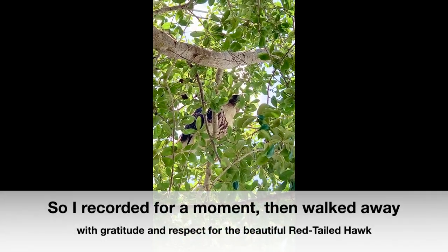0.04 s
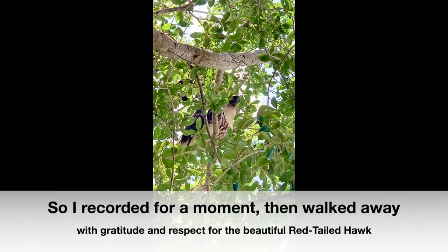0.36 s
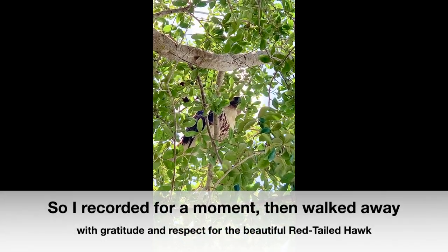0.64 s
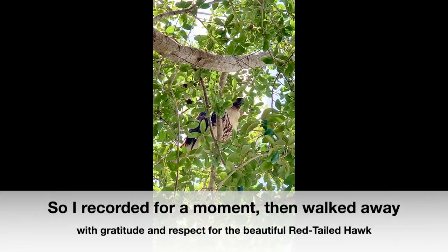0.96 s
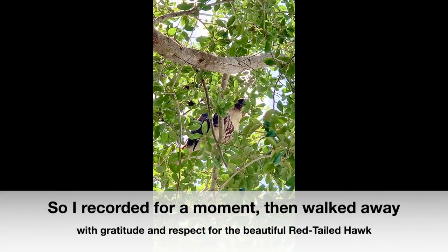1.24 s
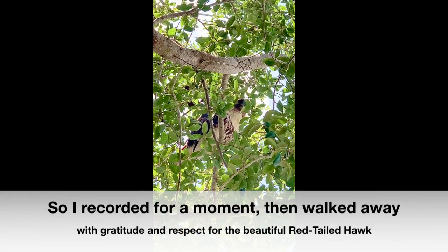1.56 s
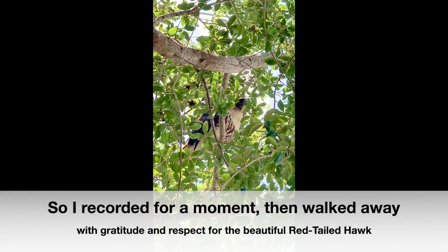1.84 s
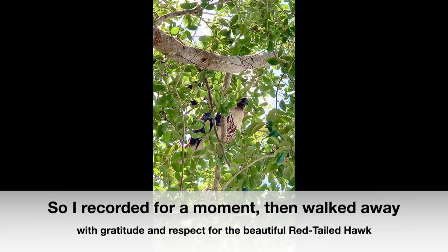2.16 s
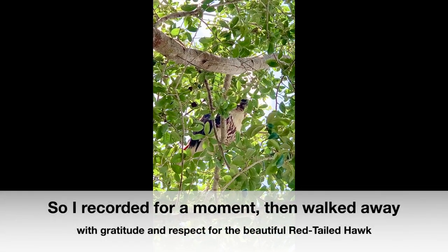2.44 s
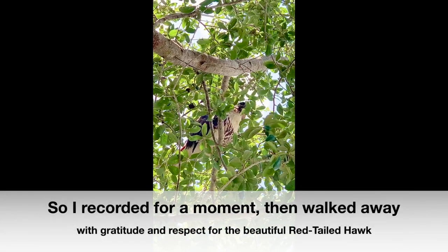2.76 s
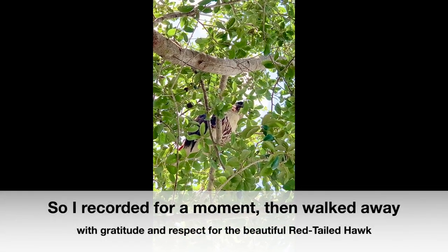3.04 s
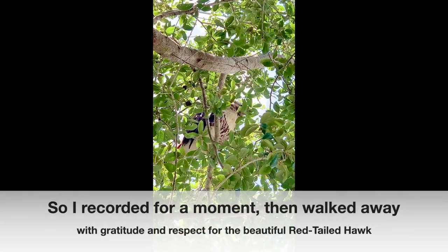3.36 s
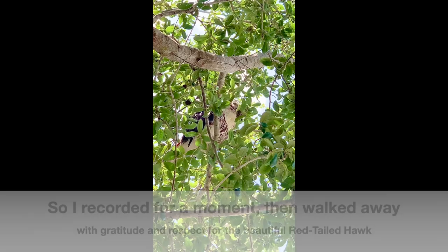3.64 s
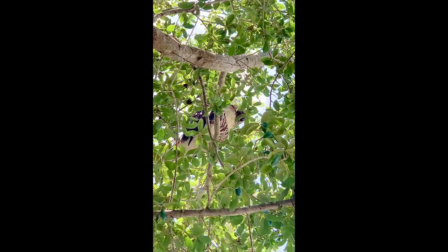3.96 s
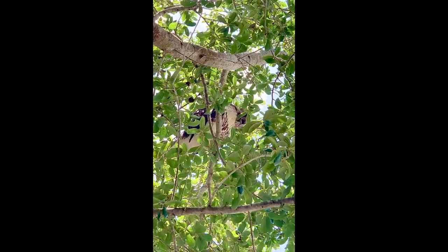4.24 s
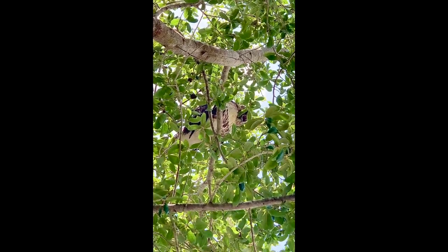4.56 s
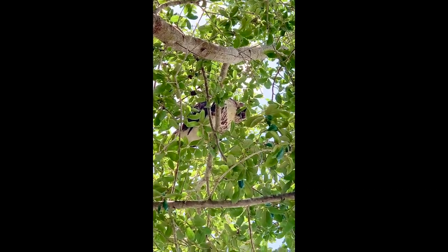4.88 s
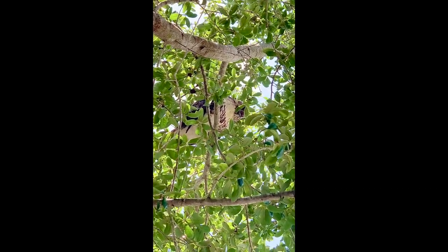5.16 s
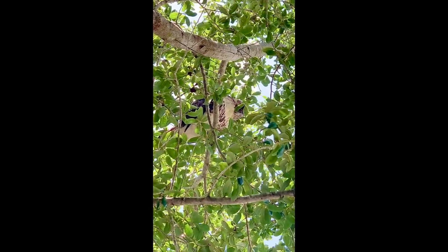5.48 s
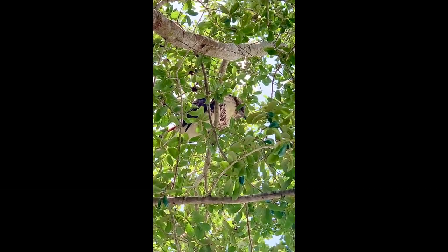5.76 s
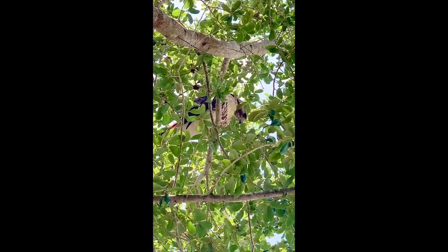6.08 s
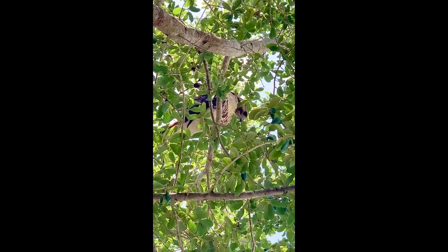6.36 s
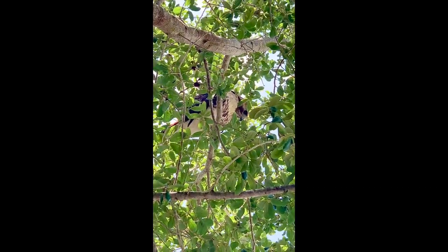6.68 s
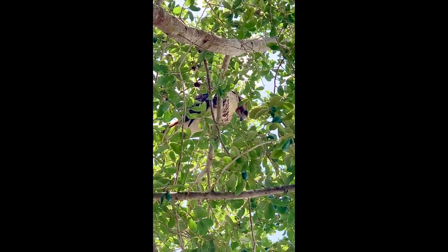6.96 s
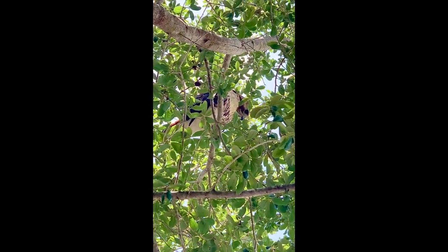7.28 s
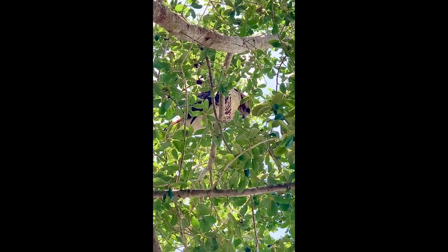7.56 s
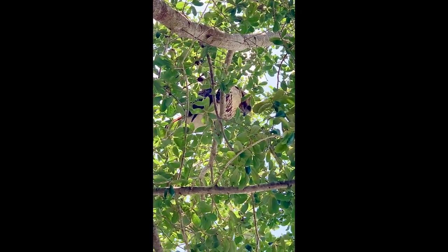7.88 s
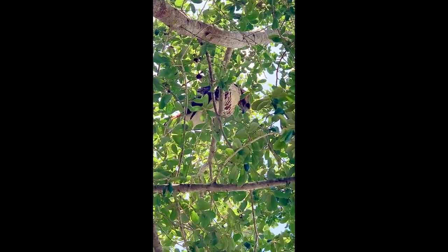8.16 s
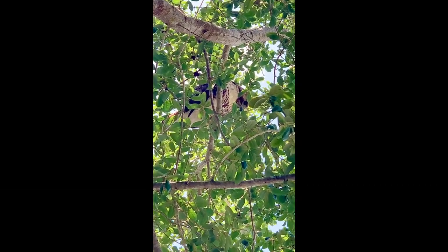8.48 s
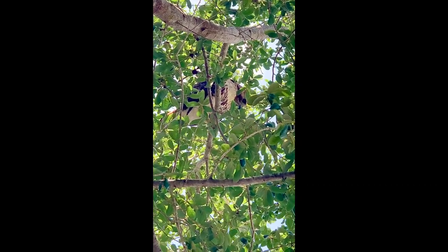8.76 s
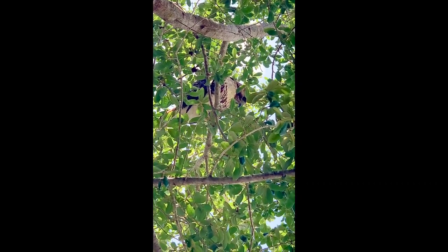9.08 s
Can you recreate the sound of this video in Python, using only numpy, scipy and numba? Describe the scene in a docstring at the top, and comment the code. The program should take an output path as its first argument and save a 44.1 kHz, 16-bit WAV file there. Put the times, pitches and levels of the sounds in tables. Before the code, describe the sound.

Low gusts and soft hand bumps touch the microphone outdoors under trees. After a faint, squeaky wheeze, a hawk gives a single long, harsh scream that starts bright, turns raspy and breaks into short whistles before giving out. The rest is quiet: uneven wind, lightly stirring leaves, a few faint high chirps and the drone of a far engine, which grows toward the end.

```python
"""In a leafy tree outdoors, a hawk wheezes faintly, then gives one long, hoarse scream.
Rough pulses of air ring in its throat; the pitch sinks as it tires, and the voice cracks into brief
clean whistles that echo off limbs, ground and leaves. Small birds chip high in the canopy.
Air and handling rumble on the microphone, and far machinery hums under a hush of traffic and leaves.
The sound is stereo: it reaches the microphone's two openings (ports) a little differently."""
import sys
import numpy as np
from scipy import signal
from scipy.fft import rfft, irfft, next_fast_len
from scipy.io import wavfile
from scipy.ndimage import uniform_filter1d
from numba import njit

SR = 44100
rng = np.random.default_rng(int(sys.argv[2]) if len(sys.argv) > 2 else 0)


def file_out(sig):
    """Save sig as 16-bit WAV at sys.argv[1]."""
    # one column per channel
    cols = np.atleast_2d(sig).T
    # limit, then scale
    lim = np.clip(cols, -1, 1)
    pcm = np.round(lim * 32767).astype(np.int16)
    wavfile.write(sys.argv[1], SR, pcm)


N = 424241
T = np.arange(N) / SR
LEFT_RIGHT = np.array([[1], [-1]])   # plus for the left port, minus for the right


def from_db(db):
    """Turn decibels into a number to multiply by."""
    return 10 ** (np.asarray(db) / 20)


def unit_power(x):
    """Scale a sound to an average power of 1."""
    return x / np.sqrt(np.mean(x ** 2) + 1e-20)


def evened(x):
    """Hold the power near 1 from moment to moment."""
    return x / np.sqrt(np.abs(uniform_filter1d(x ** 2, size=1800)) + 1e-12)


def curves(rows):
    """Join rows of (time_s, values...) into one curve for each value."""
    times, *columns = np.transpose(rows)
    return [np.interp(T, times, column) for column in columns]


def window(start_s, end_s, edge_s):
    """1 between two times, with sloping edges."""
    return np.clip(np.minimum(T - start_s, end_s - T) / edge_s + .5, 0, 1)


def swell(time_s, half_length_s):
    """A smooth hill of height 1."""
    return np.exp(-((T - time_s) / half_length_s) ** 2)


def phase_of(pitch_hz):
    """The running angle of a tone whose pitch may change."""
    return 2 * np.pi * np.cumsum(pitch_hz) / SR


def butter(x, order, edge_hz, kind="low"):
    """Keep the lows, the highs or a band."""
    return signal.sosfilt(signal.butter(order, edge_hz, kind, fs=SR, output="sos"), x)


def noise():
    """White noise."""
    return rng.standard_normal(N)


def drift(rate_hz):
    """Slow or quick random wandering, about 1 in size."""
    return unit_power(butter(rng.standard_normal(N + SR), 2, rate_hz)[SR:])


def filtered(x, response):
    """Multiply each frequency by response(hz)."""
    size = next_fast_len(N + SR)
    hz = np.maximum(np.fft.rfftfreq(size, 1 / SR), 1)
    return irfft(rfft(x, size) * response(hz), size)[..., :N]


def coloured(x, colour):
    """Shape a sound by rows of (frequency_hz, level_db), fading beyond both ends."""
    points_hz, db = np.transpose(colour)

    def response(hz):
        ends = np.minimum(hz / points_hz[0], 1) * np.minimum(points_hz[-1] / hz, 1)
        return from_db(np.interp(np.log(hz), np.log(points_hz), db)) * ends ** 2

    return filtered(x, response)


def coloured_noise(colour):
    """Shaped noise with a power of 1."""
    return unit_power(coloured(noise(), colour))


def resonance(x, hz, width_hz):
    """Let one narrow band ring through."""
    r = np.exp(-np.pi * width_hz / SR)
    feedback = [1, -2 * r * np.cos(2 * np.pi * hz / SR), r * r]
    return signal.lfilter(np.array([1, 0, -1]) * (1 - r * r) / 2, feedback, x)


@njit
def smoothed(x, step):
    """Keep the lows below a moving edge (step, in radians a sample)."""
    out, level, slope = np.zeros_like(x), 0j, 0j
    for i in range(len(x)):
        slope += step[i] * (x[i] - level - np.sqrt(2) * slope)
        level += step[i] * slope
        out[i] = level
    return out


def moving_resonance(x, hz, width_hz):
    """A ringing band whose centre and width follow curves."""
    turn = np.exp(1j * phase_of(hz))
    return np.real(turn * smoothed(x / turn, np.pi * width_hz / SR))


# Loudness of the hush: time_s, traffic_db, hiss_db
HUSH_LEVELS = [(0, -58, -71.5), (1.5, -59.5, -73.5), (2.3, -60.5, -75.5), (5.3, -59.5, -71),
               (6.5, -61, -72), (7.3, -59, -70.5), (8.8, -59, -70.5), (9.62, -58, -71.5)]
# Breeze stirring the leaves: time_s, level_db
BREEZE = [(0, -80), (2.3, -69.5), (5.3, -68.5), (6.5, -67), (7.3, -64.5), (8.8, -66.5), (9.62, -74)]
# Soft, dull rustles: time_s, half_length_s, peak_db
RUSTLES = [(7.393, .025, -66), (7.63, .03, -68), (7.865, 0.031, -60), (8.3, .12, -64.5)]
# Tone colours of the four noises: frequency_hz, level_db
TRAFFIC_COLOUR = [(100, 6.5), (250, 4), (450, 4), (700, -0.5), (1050, 1.5), (1600, -6.5), (2300, -10),
                  (3000, -23.5), (5000, -41)]
HISS_COLOUR = [(1500, -11), (2500, -12), (3500, -1), (5000, -6.5), (6600, 7), (7500, 0), (8500, -1),
               (11000, -6.5), (14000, -6)]
LEAF_COLOUR = [(1500, 10), (2700, -13), (3500, -6), (5000, -12.5), (10000, -26)]
RUSTLE_COLOUR = [(800, -2), (1150, 6), (1600, -2), (2400, -17)]
# Narrow bands that stand out of the hush: centre_hz, width_hz, gain_db
HUSH_BANDS = [(2195, 54, -6.5), (6360, 12, 11.5)]


def hush():
    """Far traffic below, leaves and hiss above."""
    traffic_db, hiss_db = curves(HUSH_LEVELS)
    traffic = from_db(traffic_db + 0.5 * drift(3.9)) * coloured_noise(TRAFFIC_COLOUR)
    traffic_lows = filtered(traffic, lambda hz: hz < 744)
    traffic -= 0.52 * window(8.14, 8.47, edge_s=.05) * traffic_lows   # the lows dip briefly
    hiss = from_db(hiss_db) * coloured_noise(HISS_COLOUR)
    leaves = from_db(curves(BREEZE)[0] + 1.9 * drift(6.6)) * coloured_noise(LEAF_COLOUR)
    swells = sum(from_db(db) * swell(s, half) for s, half, db in RUSTLES)
    rustles = swells * from_db(3.3 * drift(40)) * coloured_noise(RUSTLE_COLOUR)
    out = traffic + hiss + leaves + rustles
    return out + sum(from_db(db) * resonance(out, hz, width) for hz, width, db in HUSH_BANDS)


def side_foliage():
    """Leaves on the left rustle with the breeze and hiss steadily, reaching the left port first."""
    def from_left(colour, lead_s):
        return filtered(coloured_noise(colour), lambda hz: np.exp(1j * np.pi * hz * lead_s * LEFT_RIGHT))

    rustle = from_left([(1800, 1), (2300, -0.5), (2750, 1), (3300, -5), (4200, -24)], lead_s=0.00018)
    hiss = from_left([(3200, -14), (4200, -0.5), (5200, -2), (6000, 1), (7000, -25)], lead_s=0.000078)
    return from_db(curves(BREEZE)[0] - 2) * rustle + from_db(-78.5) * hiss


# A far engine: time_s, firing_rate_hz, level_db
ENGINE = [(0, 114, -60.5), (3.9, 114, -54.5), (4.15, 114, -44.5), (4.45, 114, -52), (5.5, 114, -57.5),
          (7.5, 112, -66), (8.2, 111, -51), (8.76, 110, -48), (8.9, 109, -41), (9.62, 108, -40.5)]
# Far electric hum: pitch_hz, level_db
HUM_TONES = [(120, -62), (238, -66.5), (360, -74)]


def machinery():
    """A far engine swells and fades over a faint electric hum."""
    firing_hz, level_db = curves(ENGINE)
    phase = phase_of(firing_hz * (1 + 0.006 * drift(6.8)))
    drone = np.sin(phase) + from_db(-14) * np.sin(2 * phase) + from_db(-29) * np.sin(3 * phase)
    engine = from_db(level_db + 1.2 * drift(4.7)) * drone
    hum = sum(from_db(db + 4.2 * drift(7.3)) * np.sin(2 * np.pi * hz * T + 0.86 * drift(6.2))
              for hz, db in HUM_TONES)
    return np.sqrt(2) * (engine + hum)


# Steady air on the microphone: time_s, level_db
AIR = [(0, -51.5), (1.5, -48), (2.3, -39.5), (3.3, -43.5), (4.2, -49), (5.2, -45), (6.9, -48.5), (7.7, -51),
       (9.62, -47.5)]
# Gusts on top of it: time_s, half_length_s, peak_db
GUSTS = [(1.703, 0.025, -40), (1.887, 0.036, -26.5), (2.586, 0.031, -36), (2.799, 0.027, -27.5),
         (2.988, 0.098, -40.5), (3.742, 0.044, -38), (4.684, 0.019, -42), (5.087, 0.16, -38),
         (5.603, 0.062, -38.5), (6.05, 0.068, -36), (6.537, 0.11, -40), (7.016, 0.026, -41),
         (8.124, 0.15, -46), (9.505, 0.05, -39.5)]
# Deep tone colour of that air: frequency_hz, level_db
AIR_COLOUR = [(12, -45), (20, -29), (41, -2.5), (65, 5.5), (117, -6), (150, -12), (233, -19.5),
              (264, -24.5), (400, -36), (520, -44), (880, -120)]
# Soft bumps of the hand: start_s, level_db, top_hz
HAND_BUMPS = [(1.707, -34, 200), (1.829, -30.5, 295), (1.885, -33.5, 200), (2.514, -36.5, 237),
              (2.566, -28, 282), (2.657, -31.5, 308), (2.694, -32.5, 275), (2.776, -34, 181),
              (3.352, -41, 297), (5.141, -39, 179), (6.051, -53, 236), (6.097, -40.5, 260),
              (6.43, -40.5, 193)]


def rumble(bump_decay_s=0.012):
    """Uneven air and gusts push on the microphone, and a hand bumps it."""
    air_power = from_db(curves(AIR)[0] + 3 * drift(5.8)) ** 2
    gust_power = sum(from_db(db) ** 2 * swell(s, half) for s, half, db in GUSTS)
    out = np.sqrt(air_power + gust_power) * evened(coloured(noise(), AIR_COLOUR))
    age = T[:SR // 2] / bump_decay_s
    for start_s, level_db, top_hz in HAND_BUMPS:
        knock = rng.standard_normal(len(age)) * (1 - np.exp(-8 * age)) * np.exp(-age)
        thud = unit_power(butter(knock, 4, [45, top_hz], "band"))
        at = int(start_s * SR)
        out[at:at + len(age)] += from_db(level_db) * thud * np.sqrt(2 * bump_decay_s)
    return out


def leaf_echoes(x, fade_s):
    """Countless small echoes off leaves and limbs, dying by 60 dB in fade_s."""
    tail = rng.standard_normal(SR) * from_db(-60 * T[:SR] / fade_s) * (T[:SR] > .002)
    return signal.fftconvolve(x, tail / np.linalg.norm(tail))[:N]


# Notes of the small birds: start_s, length_s, pitch_hz, level_db
CHIRPS = [(-.1, 0.48, 6990, -65), (1.957, 0.04, 7520, -63.5), (5.733, .11, 7630, -72),
          (5.875, 0.056, 7650, -68.5), (6.885, 0.078, 7000, -67), (7.885, 0.053, 7600, -67),
          (9.008, 0.068, 7430, -71)]


def small_birds():
    """Thin gliding notes with a quick, buzzy quaver, blurred by the canopy."""
    out, quaver = np.zeros(N), 1 + 0.013 * drift(260)
    for start_s, length_s, hz, level_db in CHIRPS:
        on = (T > start_s) & (T < start_s + length_s)
        progress = (T[on] - start_s) / length_s
        glide = -0.086 if length_s > .25 else .025   # long notes fall, short ones rise
        pitch_hz = hz * (1 + glide * (progress - .5)) * quaver[on]
        out[on] += 2 * from_db(level_db) * np.sin(np.pi * progress) * np.sin(phase_of(pitch_hz))
    return from_db(-2.5) * out + from_db(-3) * leaf_echoes(out, fade_s=0.53)


# Swells of a thin tone: time_s, half_length_s, peak_db
LINGERING_SWELLS = [(5.147, 0.051, -64), (5.28, .04, -64), (5.53, 0.03, -69), (5.812, 0.026, -59),
                    (5.96, .07, -69)]


def lingering_tone(pitch_hz=2203):
    """A thin, far tone comes and goes after the scream."""
    level = sum(from_db(db) * swell(s, half) for s, half, db in LINGERING_SWELLS)
    return np.sqrt(2) * level * np.sin(phase_of(pitch_hz * (1 + .008 * drift(59))))


# Echoes off near limbs: delay_s, strength (minus flips the wave)
LIMB_ECHOES = [(.001423, .14), (.001888, .13), (.00517, -.07), (.009076, -.1)]
# Echo off the ground: time_s, delay_s
GROUND_ECHO = [(3.25, .009775), (3.5, .00995)]


def with_near_echoes(x):
    """Limbs and ground mirror the voice; the ground path changes as the hawk moves its head."""
    def limbs(hz):
        echoes = sum(strength * np.exp(-2j * np.pi * hz * delay_s) for delay_s, strength in LIMB_ECHOES)
        return echoes / (1 + (hz / 4200) ** 6)   # thin limbs scatter the treble instead

    ground = np.interp(T - curves(GROUND_ECHO)[0], T, x)
    return x + filtered(x, limbs) + .38 * ground


# The wheeze before the scream: time_s, level_db
WHEEZE_LEVELS = [(1.54, -71), (1.6, -59.5), (1.68, -61), (1.74, -68), (1.95, -66), (2.1, -68.5),
                 (2.32, -67)]
# Its tone colour: frequency_hz, level_db
WHEEZE_COLOUR = [(900, -18), (1600, 4.5), (2200, 5.5), (3200, -5), (6000, -17), (12000, -18)]
# Squeaks within it: start_s, end_s, first_hz, last_hz, level_db
SQUEAKS = [(1.578, 1.686, 2030, 2104, -67), (1.67, 1.793, 1550, 1600, -70),
           (1.722, 1.827, 2496, 2340, -67.5), (1.806, 1.884, 1776, 1750, -62.5),
           (1.855, 1.94, 2190, 2100, -66.5), (1.974, 2.024, 1730, 1690, -61),
           (2.087, 2.103, 1580, 1664, -60), (2.175, 2.307, 2110, 2340, -71)]


def wheeze():
    """A faint rasp from the hawk, broken by thin, unsteady squeaks."""
    level = from_db(curves(WHEEZE_LEVELS)[0]) * window(1.54, 2.32, edge_s=0.0264)
    out = level * coloured_noise(WHEEZE_COLOUR)
    quaver, tremble = 1 + 0.04 * drift(220), from_db(3 * drift(35))
    for start_s, end_s, first_hz, last_hz, level_db in SQUEAKS:
        pitch_hz = np.interp(T, [start_s, end_s], [first_hz, last_hz]) * quaver
        level = from_db(level_db) * tremble * window(start_s, end_s, edge_s=0.028)
        out += np.sqrt(2) * level * np.sin(phase_of(pitch_hz))
    return out


# The scream opens with a short, clear cry, goes on hoarse, and collapses at its end.
START_S, CRY_END_S, COLLAPSE_S, END_S = 2.305, 2.46, 4.99, 5.09
CLEAR_START_S, CLEAR_END_S = 2.35, 2.435


def sag(decay_s):
    """1 until the opening cry ends, then dying away."""
    return np.exp(-np.maximum(T - CRY_END_S, 0) / decay_s)


def syrinx(pitch_hz, rough, jitter=.105, air=1.6):
    """The bird's voice box makes uneven pulses, each with a puff of air; gives sound and phase."""
    cycles = np.cumsum(pitch_hz * (1 + jitter * rough * drift(300))) / SR
    phase = 2 * np.pi * cycles
    pulses = np.diff(np.floor(cycles), prepend=0) - pitch_hz / SR
    puffs = noise() * (1 + np.cos(phase))
    return unit_power(pulses) + air * rough * unit_power(puffs), phase


# How much of the throat's sound is one ringing pitch: time_s, power_share
RINGING = [(2.43, .05), (2.51, 0.41), (2.66, 0.26), (2.76, 0.69), (2.95, 0.34), (3.03, 0.23), (3.25, .35),
           (3.4, 0.08), (4.05, 0.071), (4.24, 0.43), (4.52, .1), (4.66, .4), (5.0, 0.27)]


def throat_tone(pulses, centre_hz, width_hz, swing_limit=2.0):
    """Pulses ring in the throat; at times the membranes settle on one wavering pitch."""
    band = moving_resonance(pulses, centre_hz * (1 + 0.032 * drift(29)), width_hz)
    band = evened(butter(band, 6, 1300, "high"))   # the small beak lets out little bass
    # the membranes can only swing so far, which rounds off the loudest swells
    swing = np.abs(signal.hilbert(band, next_fast_len(N))[:N])
    band = evened(band / np.hypot(1, swing / swing_limit))
    share = np.clip(curves(RINGING)[0], 0, 1)
    ring = np.sqrt(2) * np.sin(phase_of(centre_hz * (1 + .036 * drift(70))))
    return np.sqrt(1 - share) * band + np.sqrt(share) * ring


def low_tone(pulses, throat_hz, width_hz, collapse):
    """A lower resonance follows the main one and slides down when the voice gives way."""
    centre_hz = 1533 + 0.68 * (throat_hz - throat_hz.mean()) - 320 * collapse
    shaped = coloured(pulses, [(1000, -11), (1350, 2), (4000, -3)])
    return evened(moving_resonance(shaped, centre_hz, 0.78 * width_hz))


# Tone colours of the rasp and of its highest treble: frequency_hz, level_db
RASP_COLOUR = [(1300, 3.5), (2500, -2), (3500, 7), (4200, 6.5), (5000, 11), (5750, 3), (6150, 3),
               (7200, -1.5), (7900, -20), (9200, 0), (10000, -41), (11200, -25), (12300, -26), (14000, -43)]
TREBLE_COLOUR = [(7500, 0), (9000, 7.5), (11000, 0.5), (13000, -10), (14000, -17)]
# That treble against the rest of the rasp: time_s, level_db
TREBLE_LEVELS = [(2.46, -1), (3.2, -5), (3.4, -11), (4.05, -13.5), (4.28, -13.5), (5.0, -8.5)]


def rasp(pulses):
    """Pulses and breath make a rasp, brightest at the opening, where the scream is hardest."""
    body = unit_power(coloured(pulses + 1.5 * noise(), RASP_COLOUR))
    treble = unit_power(coloured(pulses + 2.1 * noise(), TREBLE_COLOUR))
    build_up = window(START_S + 0.025, END_S + 1, edge_s=0.03)
    return evened(body + from_db(curves(TREBLE_LEVELS)[0]) * treble) * build_up


# The voice's lowest tone, which weakens once the voice cracks: time_s, strength
BASE_STRENGTH = [(2.325, 0.12), (2.35, 0.94), (4.07, 0.67), (4.18, 0.31)]


def base_tone(phase, rough, clear):
    """The tone at the pulse rate stutters as the voice roughens; the clear cry adds its octave."""
    stutter_db = 3.6 * rough * drift(23)
    dip_db = -8 * swell(CRY_END_S, 0.083)   # as the cry turns hoarse
    tone = np.sin(phase) + from_db(-11) * clear * np.sin(2 * phase)
    return np.sqrt(2) * from_db(stutter_db + dip_db) * curves(BASE_STRENGTH)[0] * tone


# Cracks in the voice: start_s, end_s, first_hz, last_hz, level_db, hoarse_change_db
CRACKS = [(2.328, 2.336, 2266, 2400, -23.5, -1), (4.044, 4.067, 2072, 2124, -29.5, 3),
          (4.073, 4.173, 1587, 1689, -31, -15.5), (4.178, 4.196, 2335, 2290, -26.5, -0.5),
          (4.335, 4.365, 1566, 1685, -31, -7), (4.371, 4.4, 2215, 2166, -29, -1.5),
          (4.429, 4.447, 2210, 2210, -35, 1.5), (4.579, 4.624, 2237, 2240, -35.5, 1.5),
          (4.683, 4.73, 2345, 2250, -31, -1.5), (4.775, 4.81, 2498, 2455, -33, -2),
          (4.821, 4.836, 2300, 2200, -26.5, -0.5), (4.881, 4.915, 2267, 2195, -29, -4.5),
          (4.931, 4.984, 2300, 2167, -29, -6.5), (5.012, 5.028, 1580, 1470, -32, -3)]
# The tones in each whistle: pitch_multiple, level_db
WHISTLE_TONES = [(1, -2), (2, -13), (3, -14.5), (4, -22), (5, -29.5)]
# Whistles are purer near the throat's resonance: pitch_hz, overtones_db
WHISTLE_PURITY = [(1600, -1.5), (2250, -18)]


def whistles():
    """The membranes briefly lock into a clean tone; gives it and a gain for the hoarse voice."""
    out, hoarse_db, waver = np.zeros(N), np.zeros(N), 1 + 0.0043 * drift(116.6)
    for start_s, end_s, first_hz, last_hz, level_db, hoarse_change_db in CRACKS:
        gate = window(start_s, end_s, edge_s=0.013)
        on = gate > 0
        phase = phase_of(np.interp(T[on], [start_s, end_s], [first_hz, last_hz]) * waver[on])
        overtones_db = np.interp(first_hz, *np.transpose(WHISTLE_PURITY))
        tone = sum(from_db(db + overtones_db * (k > 1)) * np.sin(k * phase) for k, db in WHISTLE_TONES)
        out[on] += np.sqrt(2) * from_db(level_db) * gate[on] * tone
        hoarse_db += hoarse_change_db * gate
    return out, from_db(hoarse_db)


# How hard the hawk pushes, in two lists (before and after the voice cracks): time_s, level_db
EFFORT = [
    [(2.48, -34.5), (2.926, -35), (3.302, -37.5), (3.376, -33.5), (4.05, -33)],
    [(4.39, -35), (4.786, -36), (4.954, -32.5), (5.074, -42.5), (5.08, -40.5)],
]
# Main resonance of the throat: time_s, centre_hz, width_hz
THROAT = [(2.4, 2350, 380), (2.55, 2320, 430), (2.82, 2250, 340), (2.94, 2300, 340), (3.28, 2240, 480),
          (3.42, 2180, 540), (4.05, 2090, 520), (4.19, 2300, 460), (4.42, 2180, 520), (4.55, 2190, 580),
          (4.65, 2370, 460), (4.72, 2280, 460), (4.79, 2430, 420), (4.84, 2230, 440), (4.92, 2320, 400),
          (4.98, 2170, 340)]
# Side tones above it: first_hz, last_hz, cry_lift_hz, width_hz,
# level_db, cry_db, fresh_db, fade_db_per_s, collapse_db
SIDE_TONES = [(2806, 2450, 380, 460, -5.5, 2, 5.5, 2.0, -4), (3480, 2760, 350, 430, -13.5, 4.5, 8, 3, 13),
              (5640, 5730, 60, 710, -25, 1, 15, 6.5, -5)]


def hawk_scream():
    """Rough pulses ring in the throat and its side tones; the pitch sinks as the voice tires."""
    age_s = np.clip(T, START_S, END_S) - START_S
    cry, fresh = swell(2.389, .054), sag(decay_s=0.83)
    clear = window(CLEAR_START_S, CLEAR_END_S, edge_s=.05)
    falter = 0.6 * swell(4.3, 0.027)   # the voice nearly gives way once
    collapse = np.clip((T - COLLAPSE_S) / (END_S - COLLAPSE_S), 0, 1) + falter
    rough = np.clip((.55 + .12 * age_s) * (1 - .8 * clear), 0, 1)
    cry_hz, hoarse_hz = 560.9 + 81.15 * cry, 512.8 + 190.8 * sag(decay_s=.42)
    effort_db, = curves(np.vstack(EFFORT))
    throat_hz, throat_width_hz = curves(THROAT)

    def gain(level_db, cry_db, fresh_db, fade_db_per_s, collapse_db):
        """How strong one part of the voice is through the scream."""
        change_db = cry_db * cry + fresh_db * fresh - fade_db_per_s * age_s + collapse_db * collapse
        return from_db(effort_db + level_db + change_db)

    pulses, phase = syrinx(np.where(T < CRY_END_S, cry_hz, hoarse_hz), rough)
    throat = throat_tone(pulses, throat_hz, throat_width_hz)
    low = low_tone(pulses, throat_hz, throat_width_hz, collapse)
    voice = throat * gain(1.9, cry_db=-5, fresh_db=-2, fade_db_per_s=.5, collapse_db=3)
    voice += low * gain(-9.5, cry_db=-6, fresh_db=-4.5, fade_db_per_s=.5, collapse_db=4)
    sides_on = window(CLEAR_START_S, END_S + 1, edge_s=0.057)
    for first_hz, last_hz, cry_lift_hz, width_hz, *mix in SIDE_TONES:
        centre_hz = last_hz + (first_hz - last_hz) * fresh + cry_lift_hz * cry
        waver = 1 + 0.046 * rough * drift(44)
        side = evened(moving_resonance(pulses, centre_hz * waver, width_hz * (1 - .45 * fresh)))
        voice += side * gain(*mix) * sides_on
    voice += rasp(pulses) * gain(-8, cry_db=10, fresh_db=2, fade_db_per_s=2, collapse_db=8)
    base = base_tone(phase, rough, clear)
    voice += base * gain(-14, cry_db=18, fresh_db=-2.5, fade_db_per_s=5.5, collapse_db=-7)
    clean, hoarse_gain = whistles()
    flutter = from_db(rough * (1.66 * drift(42) + drift(6.8)))   # quick tremble and slower surges
    fade_in = from_db(-20 * np.clip(1 - age_s / 0.012, 0, 1))
    fade_out = np.clip((END_S - T) / .05, 0, 1) ** .5
    outline = fade_in * fade_out * window(START_S, END_S, edge_s=0.013)
    return voice * flutter * hoarse_gain * outline + clean


# Tone colour of the sound the two ports do not share: frequency_hz, level_db
UNSHARED_COLOUR = [(100, -4.5), (300, -7.5), (700, -1), (1500, -5.5), (3300, 3), (5400, -3.5), (7200, -19),
                   (13000, -23.5)]
# How far the left port runs ahead of the right: frequency_hz, lead_radians
LEFT_LEAD = [(0, 0), (1030, 0.8), (1290, -0.2), (2240, 1.0), (2840, 2.5), (3530, 0.2), (5250, 3.3),
             (5860, 5.4), (7490, 6.5), (9390, 9.2), (10200, 9.6), (11800, 12.5), (13000, 12.5),
             (13900, 15.5)]


def scene():
    """Everything reaches two close ports, partly alike and with a lag between them."""
    birds = with_near_echoes(hawk_scream() + wheeze()) + small_birds()
    far_echo = coloured(leaf_echoes(birds, fade_s=1.8), [(500, 6), (2200, 1), (5000, -13), (12000, -12)])
    canopy = leaf_echoes(birds, fade_s=0.089)
    shared = birds + from_db(-10) * canopy + from_db(-28) * far_echo + lingering_tone()
    shared = shared * from_db(0.25 * LEFT_RIGHT)   # the hawk sits a little to the left
    unshared = from_db(-5.5) * leaf_echoes(birds, fade_s=0.11) + from_db(3) * hush()
    outdoors = shared + hush() + coloured(unshared, UNSHARED_COLOUR) * LEFT_RIGHT
    # both ports feel nearly the same air, except when a swirl strikes each differently
    swirl = from_db(-3) * window(1.53, 1.97, edge_s=.05)
    wind = rumble() + (from_db(-56) + swirl) * rumble() * LEFT_RIGHT
    ports = from_db(-3) * outdoors + wind + machinery()
    lead = np.transpose(LEFT_LEAD)
    return filtered(ports, lambda hz: np.exp(.5j * np.interp(hz, *lead) * LEFT_RIGHT)) + side_foliage()


def record(dry, cutoff_hz=14300):
    """The highest treble is cut off steeply."""
    return signal.sosfilt(signal.ellip(10, .3, 80, cutoff_hz, fs=SR, output="sos"), dry)


dry = scene()
out = record(dry)
file_out(out)
```